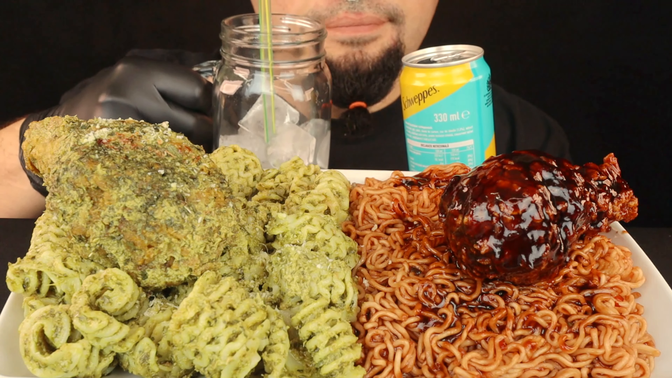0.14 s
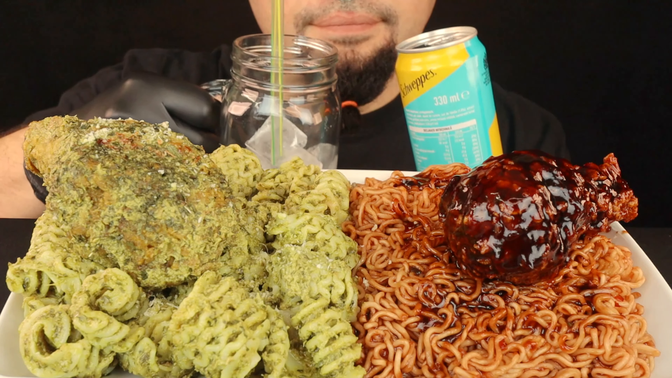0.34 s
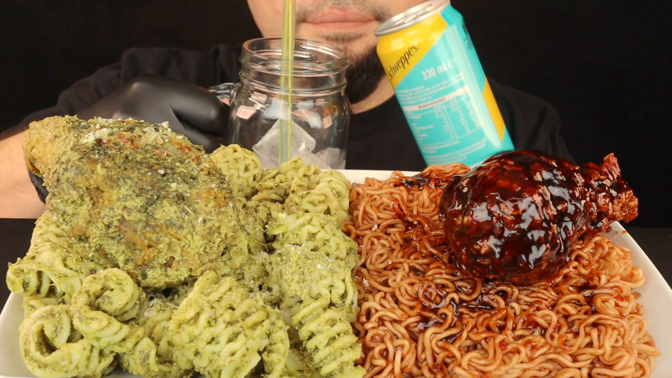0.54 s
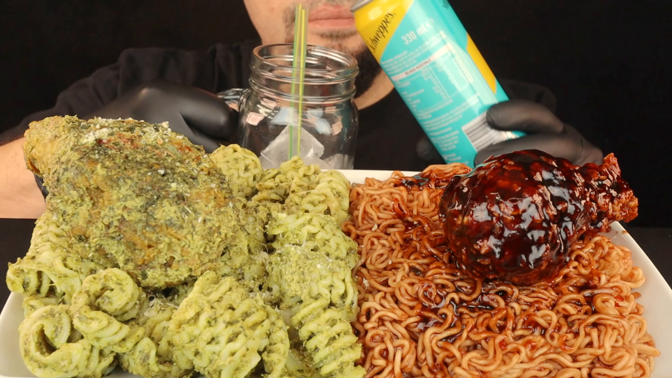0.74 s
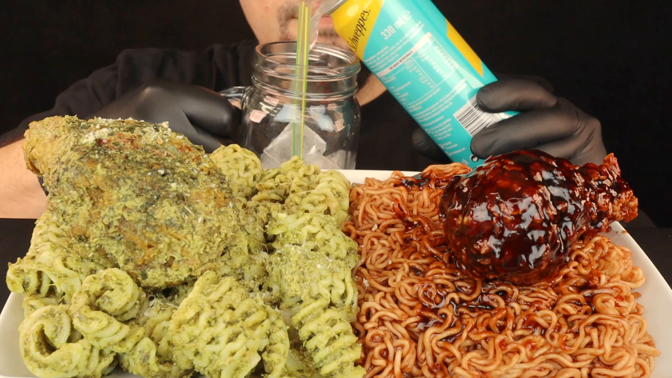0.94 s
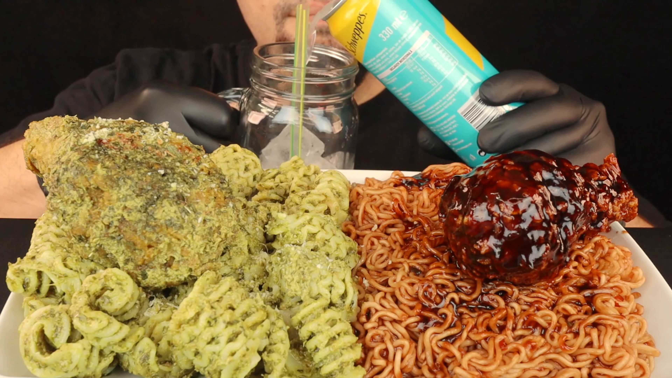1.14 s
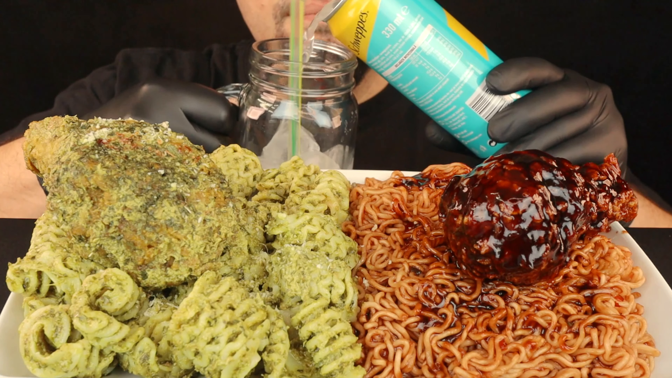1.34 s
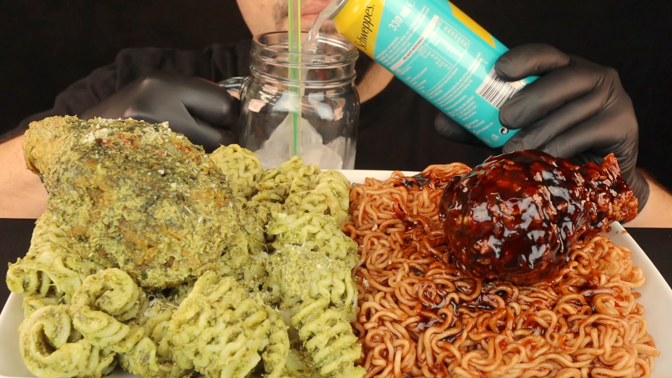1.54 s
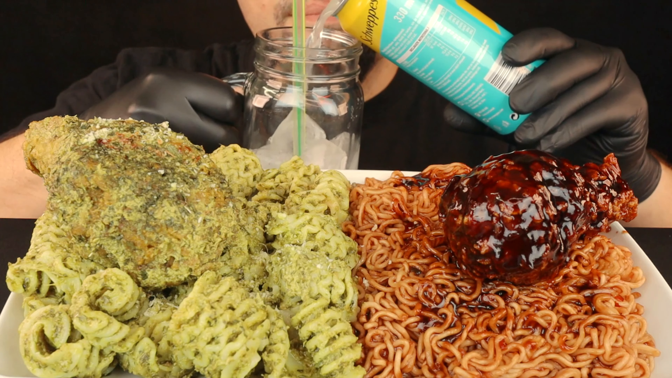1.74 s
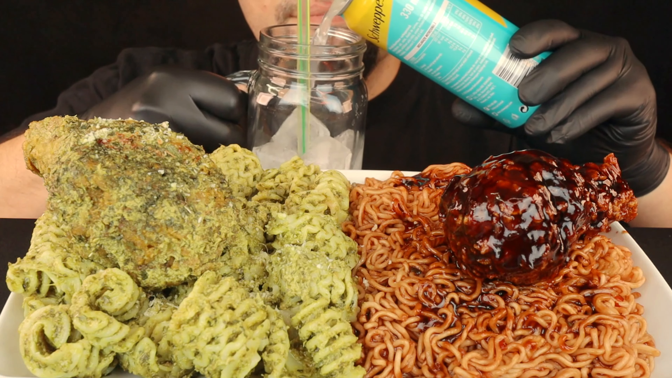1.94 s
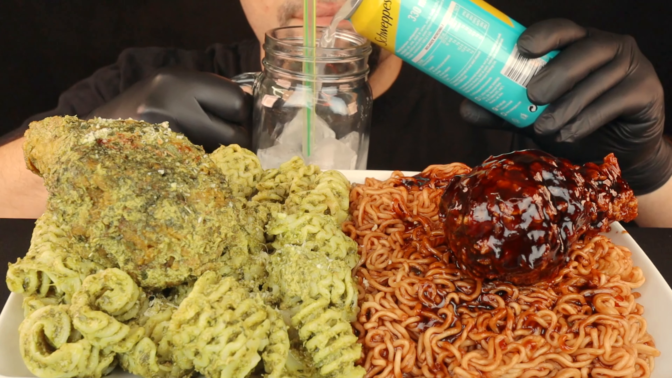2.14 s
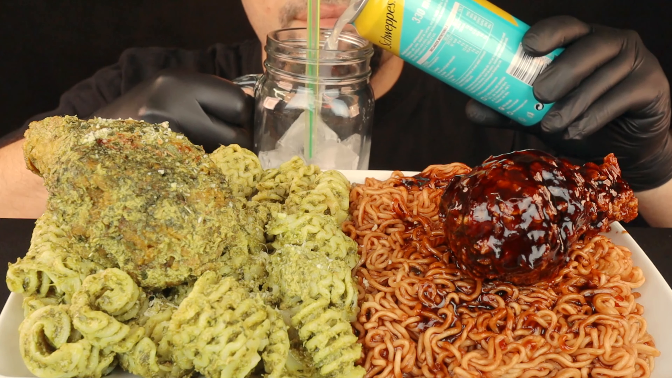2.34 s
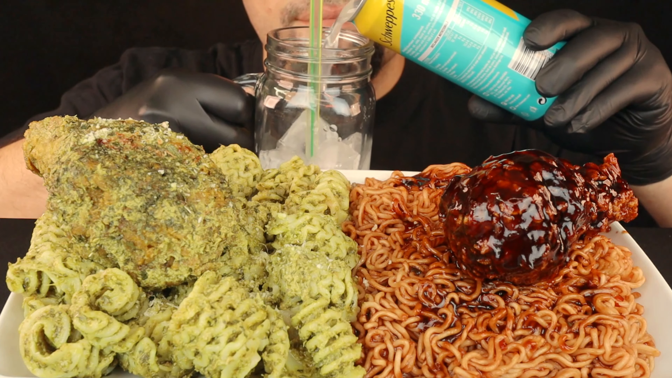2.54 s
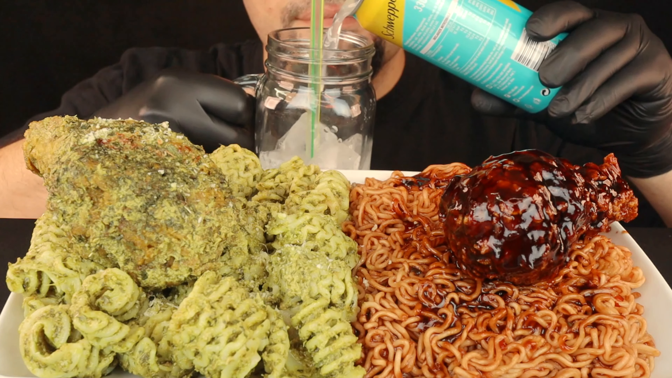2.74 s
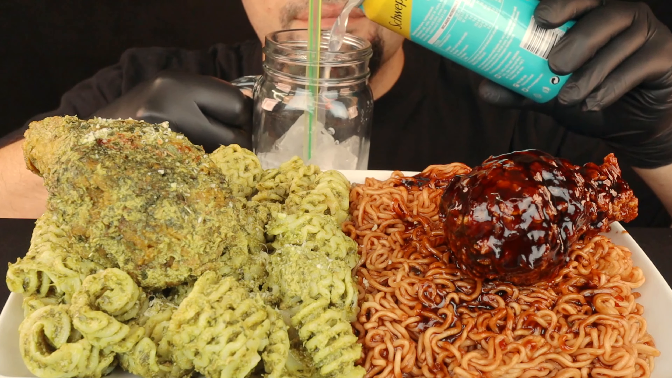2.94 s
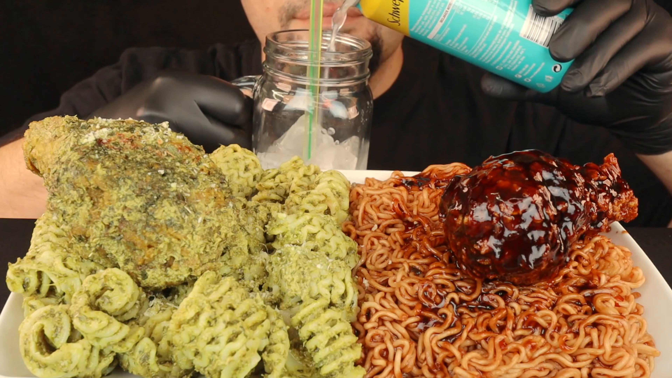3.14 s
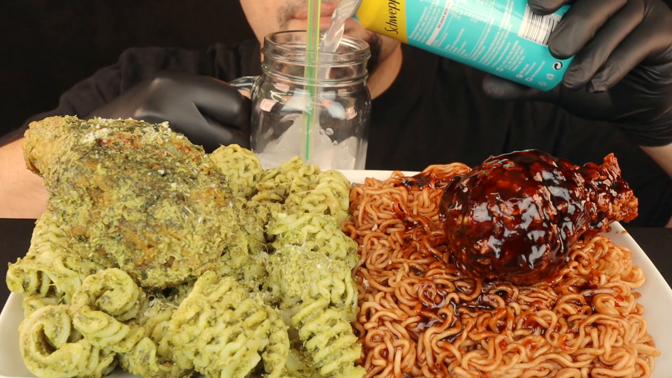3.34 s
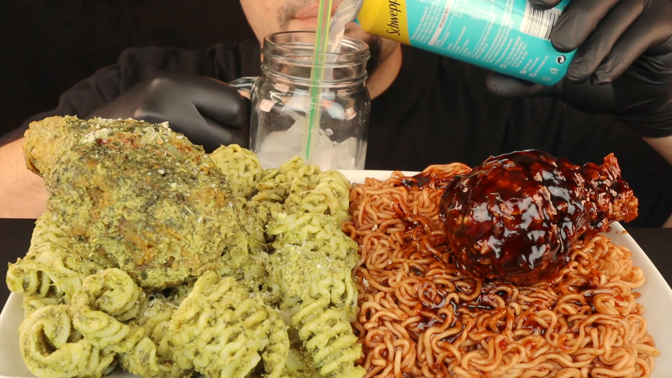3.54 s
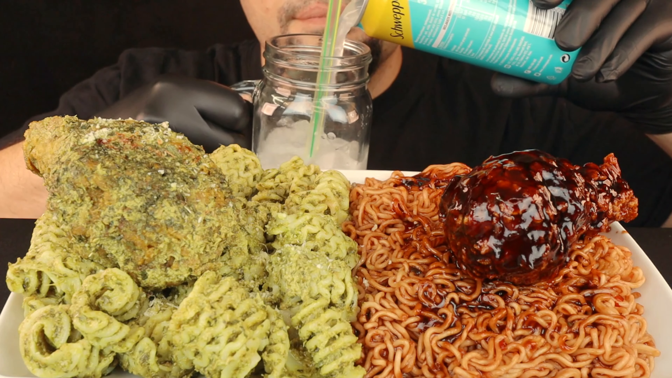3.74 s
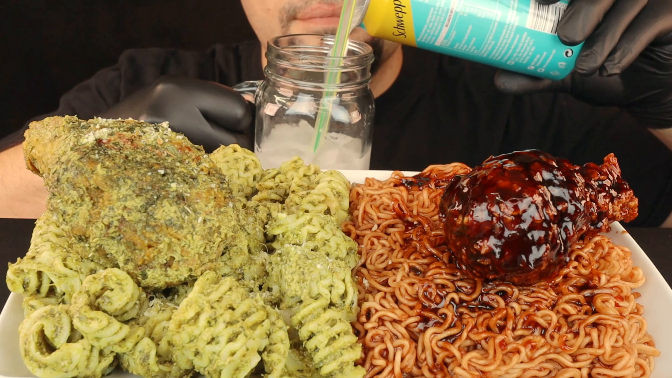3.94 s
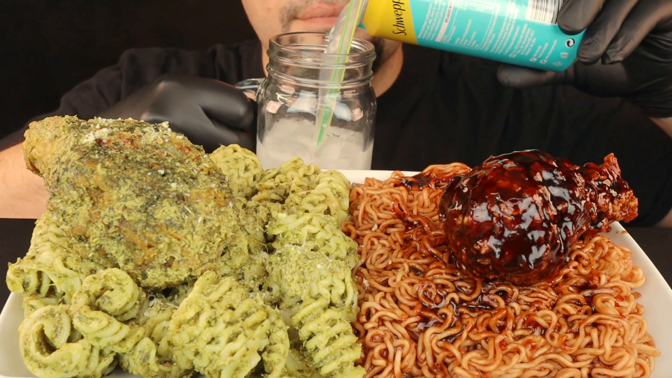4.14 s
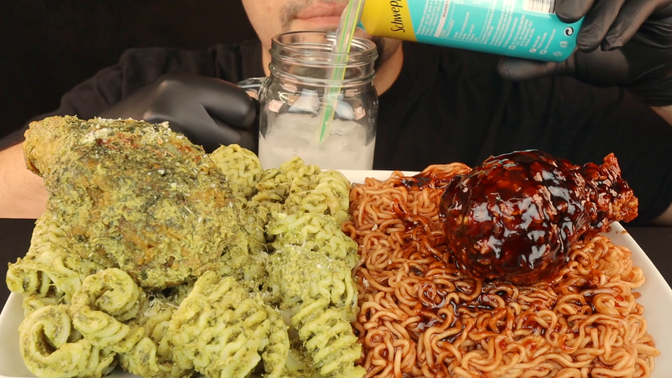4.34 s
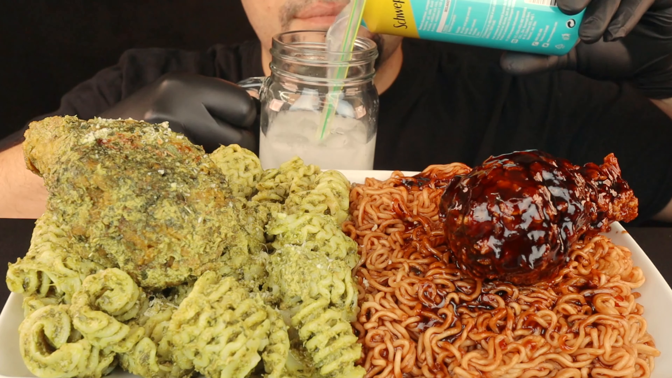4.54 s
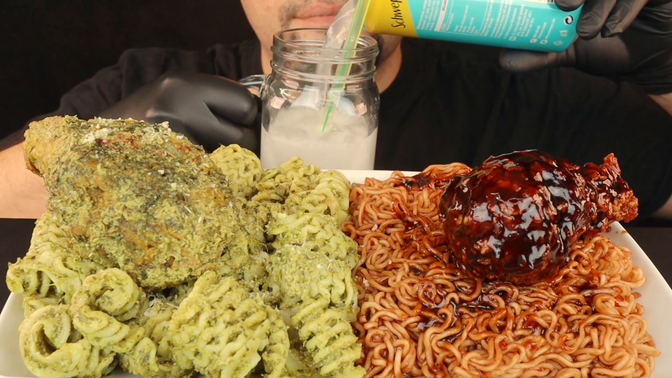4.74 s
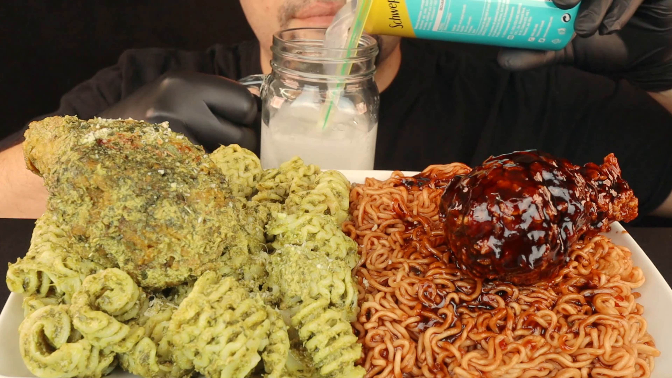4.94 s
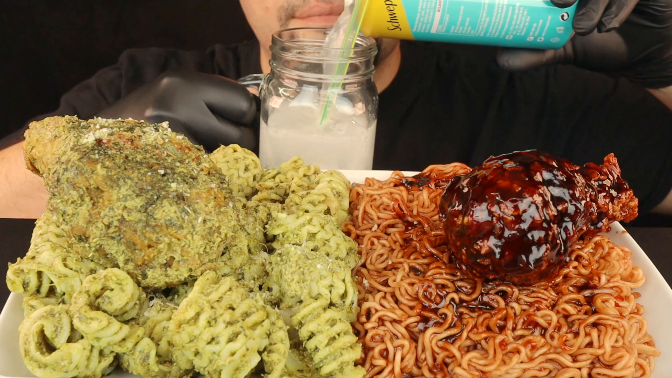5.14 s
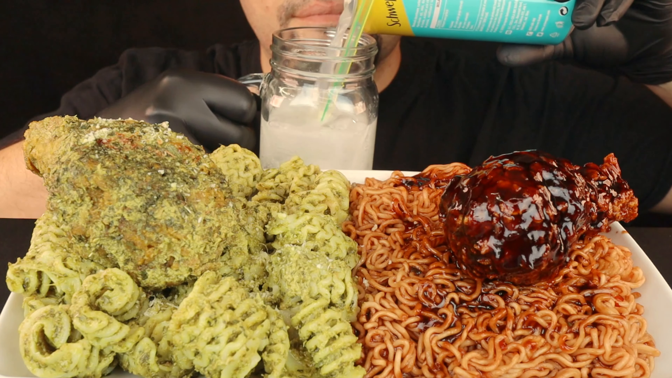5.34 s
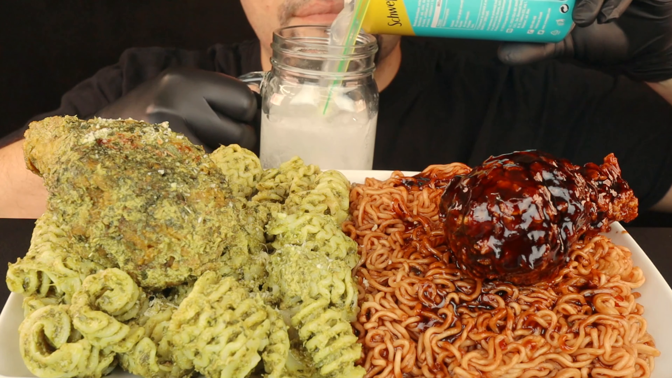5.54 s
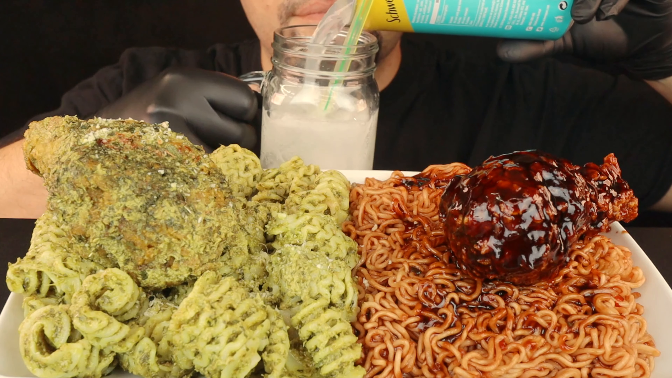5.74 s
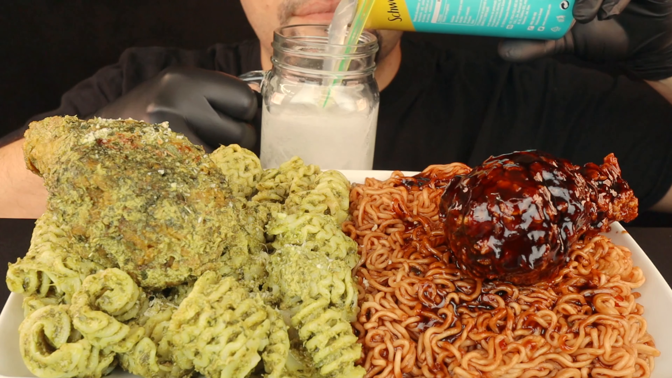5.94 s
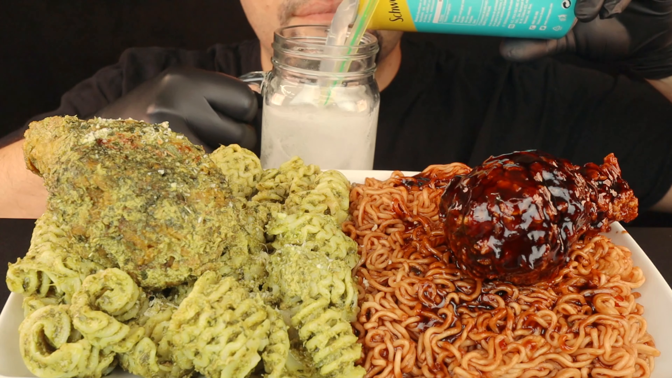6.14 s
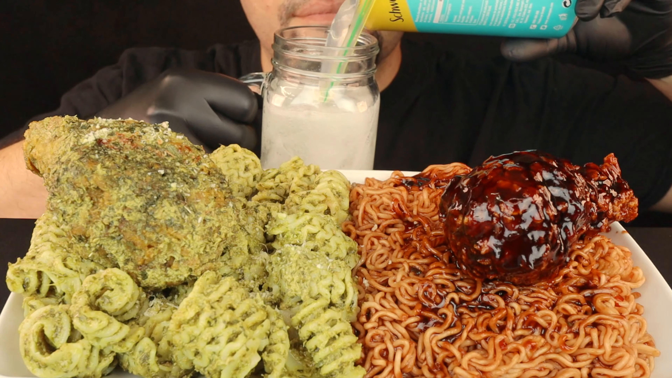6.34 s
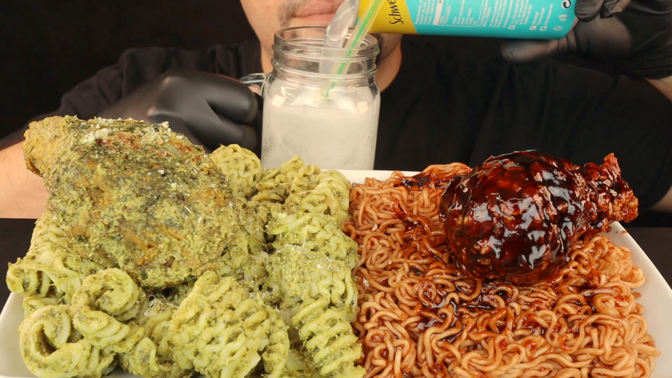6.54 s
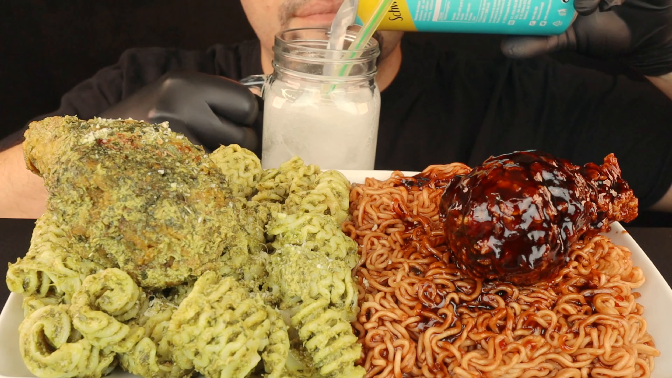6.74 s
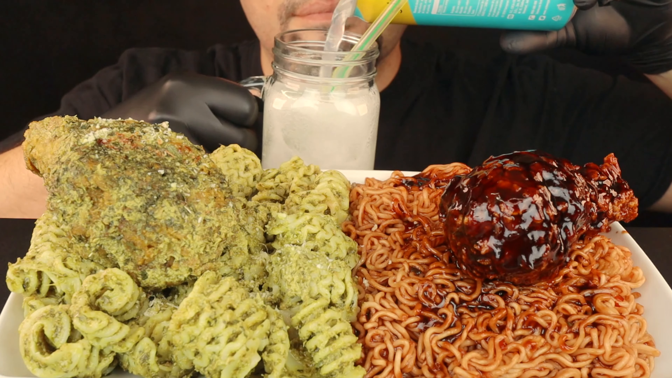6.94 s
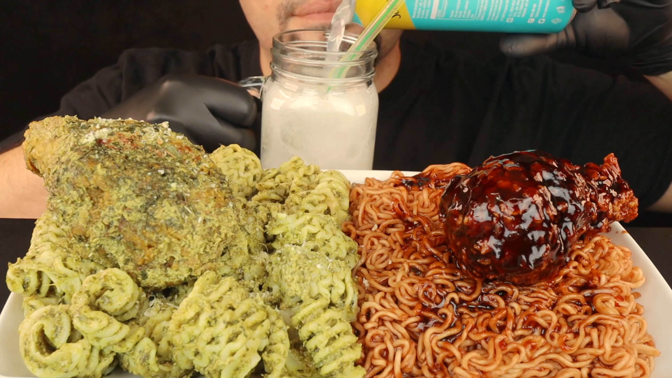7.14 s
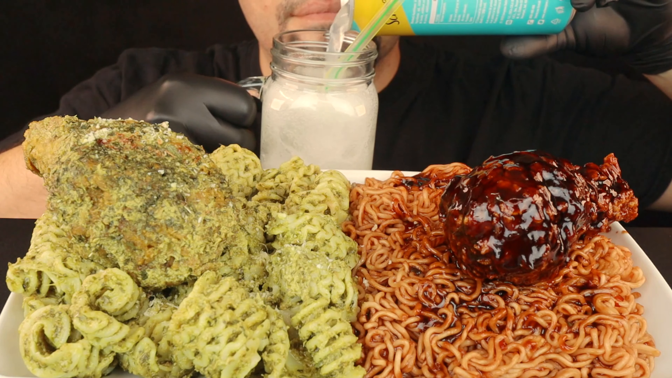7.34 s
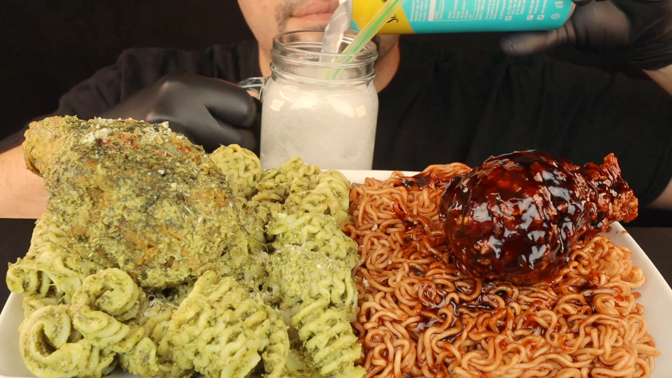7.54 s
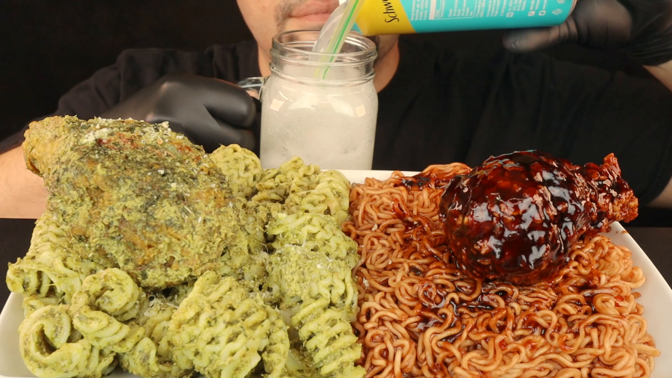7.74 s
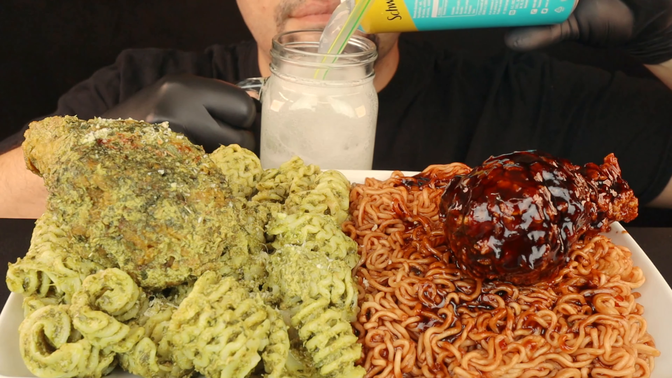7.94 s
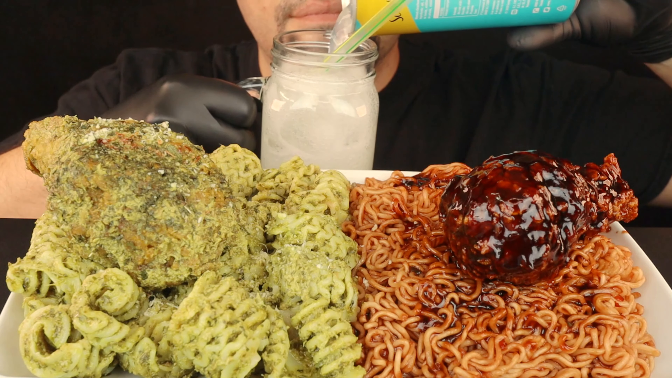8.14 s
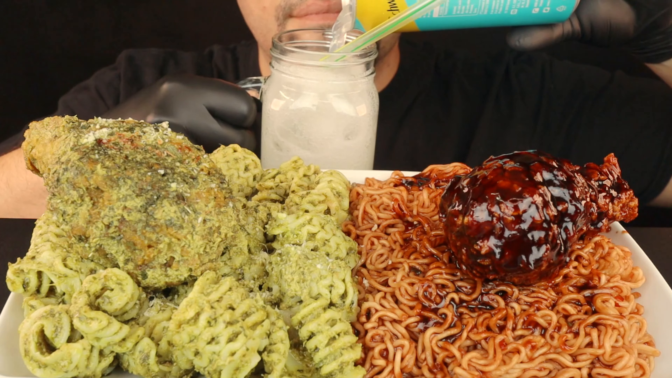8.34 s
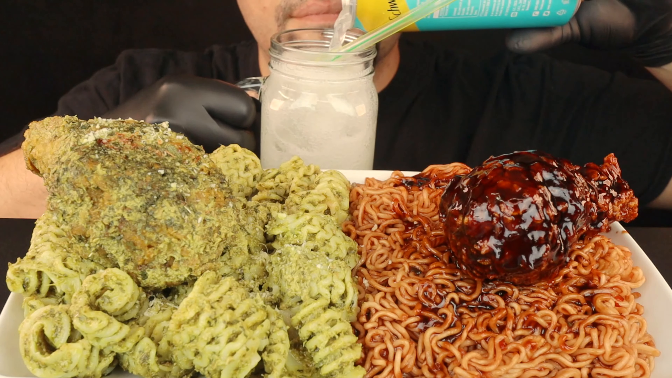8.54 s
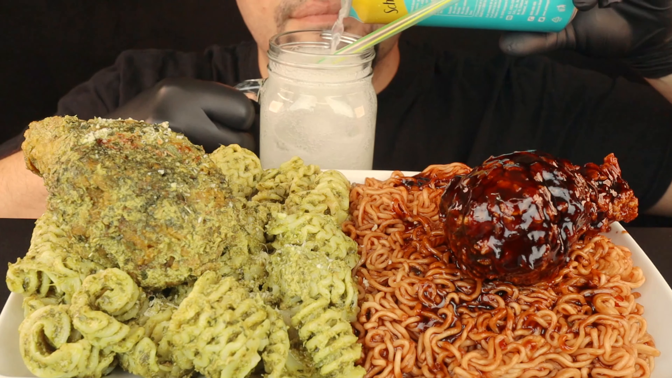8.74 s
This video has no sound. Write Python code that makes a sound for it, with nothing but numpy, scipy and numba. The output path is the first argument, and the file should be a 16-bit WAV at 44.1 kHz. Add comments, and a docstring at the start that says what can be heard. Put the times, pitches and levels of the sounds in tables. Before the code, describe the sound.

A can creaks and clinks on a glass jar, then fizzy drink glugs over ice, the pitch rising as foam builds to a crackling hiss.

```python
"""Soda poured over ice

A can of soda is picked up, knocks on a glass jar with ice and is emptied into it, close to two microphones.
Random bursts of splashes ring the air in the jar, whose pitch rises as it fills and which foam deadens.
Bubbles and gulps are swelling sines, ice and glass are short decaying modes with noise, and the fizz is
a dense rain of clicks that swells as the head climbs to the rim."""
import sys
import numpy as np
from scipy import signal
from scipy.fft import rfft, irfft, next_fast_len
from scipy.io import wavfile
from scipy.ndimage import uniform_filter1d
from numba import njit

SR = 44100
rng = np.random.default_rng(int(sys.argv[2]) if len(sys.argv) > 2 else 0)


def unload_audio(sound):
    """Save the sound as a 16-bit wav file, at the path given as the first command line argument."""
    columns = np.transpose(np.atleast_2d(sound))
    # keep every value between -1 and 1, then stretch to whole-number steps
    steps = np.round(np.clip(columns, -1, 1) * 32767)
    wavfile.write(sys.argv[1], SR, steps.astype(np.int16))


N = 387638
T = np.arange(N) / SR
BRIEF = T[:SR // 8]  # time axis of one short event


def gain_of(db):
    """Turns decibels into a factor."""
    return 10 ** (np.asarray(db) / 20)


def along(table, column, t=T):
    """Reads one column of a curve at the times t, with straight lines between rows."""
    rows = np.array(table)
    return np.interp(t, rows[:, 0], rows[:, column])


def band(x, low_hz, high_hz, order=2):
    """Keeps only the pitches between two limits."""
    limits = [low_hz, min(high_hz, SR / 2 - 1)]
    return signal.sosfilt(signal.butter(order, limits, "band", fs=SR, output="sos"), x)


def colour(x, points):
    """Gives x a spectrum drawn on a log-frequency axis."""
    hz, db = np.transpose(points)
    size = next_fast_len(N)
    log_hz = np.log(np.fft.rfftfreq(size, 1 / SR) + 1)
    shape = gain_of(np.interp(log_hz, np.log(hz), db))
    return irfft(rfft(x, size) * shape, size)[..., :N]


@njit
def smooth(x, keep):
    """One-pole low-pass whose memory may change in time."""
    out = np.zeros_like(x)
    for i in range(1, len(x)):
        out[i] = keep[i] * out[i - 1] + (1 - keep[i]) * x[i] + 1e-20
    return out


def resonate(x, hz, width):
    """A resonance of gain 1 that may move: shift its pitch to zero, smooth, shift back."""
    turn = np.exp(2j * np.pi * np.cumsum(hz * np.ones(len(x))) / SR)
    keep = np.exp(-np.pi * width * np.ones(len(x)) / SR)
    return 2 * (turn * smooth((x + 0j) / turn, keep)).real


def evened(x):
    """Scales to a level of one."""
    return x / x.std()


def played(x, level_db, size=8001):
    """Makes the running level of a stereo sound follow a curve."""
    power = uniform_filter1d(uniform_filter1d((x ** 2).mean(0), size), size)
    return x * gain_of(level_db) / np.sqrt(abs(power) + 1e-14)


def add(mix, s, db, sound):
    """Adds a stereo sound whose first hundredth of a second has the level db."""
    part = mix[:, round(s * SR):][:, :sound.shape[1]]
    start_level = np.sqrt(np.mean(sound[:, :SR // 100] ** 2))
    part += (gain_of(db) * sound / start_level)[:, :part.shape[1]]


def bursts(per_s, spread_db, most=4):
    """Random impulses of either sign: many small, few large."""
    out, at = np.zeros(N), np.flatnonzero(rng.random(N) < per_s / SR)
    signs = rng.choice([-1, 1], len(at))
    size_db = np.broadcast_to(spread_db, N)[at] * np.minimum(rng.exponential(1, len(at)), most)
    out[at] = signs * gain_of(size_db)
    return out


def bubble(hz, cycles, onset=0.46):
    """A bubble rings as a sine that swells and dies within some cycles."""
    turns = hz * BRIEF
    swell = 1 - np.exp(-turns / onset)
    return np.sin(2 * np.pi * turns) * swell * np.exp(-np.minimum(turns / cycles, 20))


def each_bubble(hits, hz, cycles):
    """Every impulse sets off one bubble."""
    return signal.oaconvolve(hits, bubble(hz, cycles))[:N]


def dying(t60):
    """Fades by 60 dB in t60 seconds."""
    return np.exp(-np.log(1000) * BRIEF / t60)


def walls(x, wet=0.99, decay_s=0.00083, low_hz=2600, size=400):
    """Treble builds up between the glass walls and reaches each microphone by other paths."""
    age = T[:size] / decay_s
    paths = band(rng.standard_normal((2, size)), low_hz, SR / 2) * age * np.exp(-age)
    paths *= wet / np.linalg.norm(paths, axis=1, keepdims=True)
    paths[:, 0] += 1  # the direct sound
    return signal.oaconvolve(x[None], paths, axes=1)[:, :len(x)]


# the drink as it rises: t/s, share of surface under foam 0-1, pitch of the churning f/Hz
DRINK_RISE = [(3.2, 0, 366), (4.7, 0.21, 294), (6.1, 0.75, 235), (7.1, 1, 205)]


def foam_at(t=T):
    """Share of the surface under foam."""
    return np.clip(along(DRINK_RISE, 1, t), 0, 1)


def cloud_ring(x, t):
    """The bubble cloud under the surface resonates low, and lower as the drink rises."""
    return resonate(x, along(DRINK_RISE, 2, t), width=99)


def leak_at(t):
    """The more foam shuts the mouth, the more of the sound comes through the glass."""
    return 0.03 + 0.16 * foam_at(t)


# air above the drink, shortening as the jar fills: t/s, lowest mode f/Hz
AIR_PITCH = [(1.3, 657), (2.2, 677), (2.8, 746), (4.5, 878), (5.5, 990), (6.0, 1110), (6.6, 1300),
             (8.8, 2020)]


def first_at(t):
    """Pitch of the lowest air mode."""
    return along(AIR_PITCH, 1, t)


def bare_at(t, knee_hz=194):
    """Share of the ice that still stands clear of the drink."""
    return np.exp((AIR_PITCH[0][1] - first_at(t)) / knee_hz)


def second_at(t, empty_hz=1448, full_hz=3600):
    """Pitch of the second air mode, which climbs fast while the ice is being covered."""
    return full_hz - (full_hz - empty_hz) * bare_at(t)


THIRD_RATIO = 1.217  # third air mode against the second


def air(x, t, upper_db=-7, upper_width=2.6):
    """The air rings higher as the jar fills, and foam damps it; ice pocket and glass add their own rings."""
    foam, bare, first, second = foam_at(t), bare_at(t), first_at(t), second_at(t)
    width = first * (0.078 + 0.28 * foam ** 2)
    upper = resonate(x, second, upper_width * width)
    upper = upper + gain_of(-9.5) * resonate(x, THIRD_RATIO * second, upper_width * width)
    upper_gain = gain_of(upper_db + 7.4 * bare - 11.0 * foam)
    pocket = 0.5 * bare ** 4 * resonate(x, 1940, 120)  # between the cubes, until they are covered
    glass = x + 1.52 * resonate(x, 746, 400) + 2.0 * resonate(x, 3470, 410)
    heard = resonate(x, first, width) + upper_gain * upper + pocket + leak_at(t) * glass
    return heard - (1 - 0.41 * foam) * resonate(heard, 1164, 210)  # a hollow in the spectrum


def air_ring(s):
    """One push on the air in the jar."""
    push = band(bubble(first_at(s), cycles=0.42), 555, 3600)
    return evened(air(push, s + BRIEF))


def slap(s):
    """The surface closes with a wet slap, each a little different; foam makes it stronger and shakes the cloud."""
    noise = rng.standard_normal(len(BRIEF)) * np.exp(-BRIEF / 0.0033)
    wet = band(noise, 520, 3030)
    hz = first_at(s) * np.exp(0.29 * rng.standard_normal())
    cloud = 1.22 * foam_at(s) * cloud_ring(noise, s)
    sound = wet + resonate(wet, hz, hz / 2) + 2.8 * resonate(wet, 657, 310) + cloud
    return 1.64 * np.sqrt(leak_at(s)) * evened(sound)


# faint noise of the room: f/Hz, relative level per Hz/dB
ROOM_COLOUR = [(15, -9), (60, -2.5), (230, -3), (700, -6.5), (3000, -13), (16000, -21)]


def room():
    """Faint low noise of a quiet room, partly shared by the two channels."""
    noise = colour(rng.standard_normal(N) + 4.2 * rng.standard_normal((2, N)), ROOM_COLOUR)
    return gain_of(-54.0) * evened(noise)


def echoes(x, t60=0.12, size=9000):
    """The short answer of the room: dying noise after a 4 ms gap."""
    tail = band(rng.standard_normal((2, size)), 140, 5500, order=1)
    tail *= np.exp(-np.log(1000) * T[:size] / t60) * (T[:size] > .004)
    return signal.oaconvolve(x, tail / np.linalg.norm(tail[0]), axes=1)[:, :N]


def lifting(rub_db=-56, rub_s=1.08, rub_length_s=0.35):
    """A soft rub as the can turns in the glove: low noise that swells and fades."""
    rub = evened(band(rng.standard_normal(N), 254, 410))
    return gain_of(rub_db) * rub * np.exp(-((T - rub_s) / rub_length_s) ** 2)


# resonances of the can as it creaks in the glove: f/Hz, width/Hz, relative level/dB
CAN_RINGS = [(658, 15, 14), (2390, 110, 0), (7600, 450, -4), (12500, 600, 5)]


def creak(start=0.184, end=.332, slips_per_s=85):
    """The can sticks and slips unevenly in the glove as it is picked up: each slip is a short bright scuff."""
    unevenness = np.exp(8 * uniform_filter1d(rng.standard_normal(N), size=200))
    turns = np.cumsum(slips_per_s * unevenness) / SR
    grip = np.sqrt(abs(np.sin(np.pi * np.clip((T - start) / (end - start), 0, 1))))
    slips = np.diff(np.floor(turns), prepend=0) * rng.uniform(0.39, 1, N) * grip
    fading = signal.oaconvolve(slips, np.exp(-BRIEF / 0.0041))[:N]
    scuffs = (fading * rng.standard_normal(N))[:SR // 2]
    metal = sum(gain_of(db) * resonate(scuffs, hz, width) for hz, width, db in CAN_RINGS)
    ring = walls(0.5 * band(scuffs, 5200, 14000) + metal, wet=2)
    return np.pad(gain_of(-42.0) * evened(ring), ((0, 0), (0, N - SR // 2)))


# modes of the jar with ice: f/Hz, level before tilt/dB, fade by 60 dB t/s
JAR_MODES = [(483, -11, 0.12), (672, 0, 0.11), (940, -8, 0.029), (1466, -3, 0.036), (2220, -4, 0.1),
             (2690, 5, 0.05), (3135, -7, 0.12), (4030, -1.5, 0.027), (5120, -8, 0.041)]


def glassy(x, ring=1.0):
    """What bursts against the wall sets the modes of the jar ringing."""
    modes = sum(np.cos(2 * np.pi * hz * BRIEF) * dying(t60) * 2 * np.log(1000) / (t60 * SR)
                for hz, _, t60 in JAR_MODES)
    return x + ring * signal.oaconvolve(x, modes[None], axes=1)[:, :N]


# knocks of can and ice on the jar: t/s, level/dB, tilt/dB per octave
JAR_KNOCKS = [(0.9634, -18, -4.5), (0.9933, -28.5, -6), (1.3806, -11, 10), (1.3873, -14.5, -2),
              (1.416, -17.5, 5)]


def knocks():
    """A knock is a short noisy crack plus the modes of the jar, slightly detuned each time."""
    out, (hz, mode_db, t60) = np.zeros((2, N)), np.transpose(JAR_MODES)[:, :, None]
    for s, db, tilt_db in JAR_KNOCKS:
        # each channel hears its own phases, more so in the treble
        phase = 2 * np.pi * rng.random(hz.shape) + rng.standard_normal((2, *hz.shape)) * hz / 5000
        detuned = hz * (1 + 0.025 * rng.standard_normal(hz.shape))
        strength = gain_of(mode_db + tilt_db * np.log2(hz / 2000))
        ring = strength * dying(t60) * np.sin(2 * np.pi * detuned * BRIEF + phase)
        crack = band(rng.standard_normal((2, len(BRIEF))), 1100, 4800, order=1) * np.exp(-BRIEF / 0.0082)
        add(out, s, db, ring.sum(1) + gain_of(17) * crack)
    return out


# floating ice bumps the glass: t/s, level/dB, tilt/dB per octave
ICE_BUMPS = [(6.6598, -20.5, -6), (6.685, -12.5, -6.5), (7.038, -12, -9), (7.112, -10, 5.5),
             (7.4189, -17.5, 2), (7.456, -23, -9), (7.7947, -15, 1.5), (8.3185, -12.5, 3),
             (8.4835, -13, 1.5)]
# ice against glass, damped by the drink: f/Hz before detuning, level before tilt/dB, fade by 60 dB t/s
ICE_MODES = [(666, -2.5, 0.023), (910, -1.5, 0.026), (1470, 3.5, 0.011), (2040, -8, 0.027), (3294, 0, 0.02)]


def bumps(thump_db=-5):
    """Floating ice nudges the glass: a dull thump of noise and a few short modes."""
    out, (hz, mode_db, t60) = np.zeros((2, N)), np.transpose(ICE_MODES)[:, :, None]
    for s, db, tilt_db in ICE_BUMPS:
        turns = hz * rng.uniform(0.937, 1.034, hz.shape) * BRIEF
        strength = rng.choice([-1, 1], hz.shape) * gain_of(mode_db + tilt_db * np.log2(hz / 1000))
        ring = strength * dying(t60) * np.sin(2 * np.pi * turns)
        thump = evened(band(rng.standard_normal(len(BRIEF)), 156, 1800)) * np.exp(-BRIEF / 0.0079)
        bump = ring.sum(0) + gain_of(thump_db) * thump
        add(out, s, db, walls(band(bump, 480, 4300), wet=0.6))
    return out


# sharp ticks of can, drops and cracking ice: t/s, level/dB, centre f/Hz
SHARP_TICKS = [(0.2062, -37, 7700), (0.6496, -28, 9150), (0.731, -36, 9100), (1.2438, -23, 6260),
               (1.448, -24, 8500), (1.6178, -20.5, 9500), (1.684, -17.5, 12600), (1.7466, -20.5, 7060),
               (2.677, -18.5, 10800), (2.927, -16.5, 9000), (3.288, -25, 9500), (3.303, -24, 7950),
               (3.397, -20.5, 11000), (3.4635, -14, 10900), (3.509, -17.5, 7950), (3.6522, -20.5, 9100),
               (3.7055, -17, 10300), (3.8856, -14, 8650), (4.203, -16.5, 9100), (4.261, -16.5, 11900),
               (4.3903, -15.5, 12600)]


def ticks():
    """A tick is a few quickly dying cycles of a high sine, with a push on the air in the jar."""
    out = np.zeros((2, N))
    for s, db, hz in SHARP_TICKS:
        add(out, s, db, walls(evened(bubble(hz, cycles=0.78)) + 0.26 * air_ring(s), wet=2.5))
    return out


# the can gulps air: t/s, level/dB, f/Hz
CAN_GULPS = [(5.044, -32, 125.2), (5.073, -27, 110), (5.137, -22.5, 146), (5.567, -26.5, 112),
             (5.63, -24.5, 100), (5.686, -32.5, 200)]


def gulps():
    """A gulp is a slow-swelling low bubble, while the drink slops back inside the can as low noise."""
    out = np.zeros((2, N))
    for s, db, hz in CAN_GULPS:
        slosh = band(rng.standard_normal(len(BRIEF)), 170, 306) * np.exp(-BRIEF / 0.035)
        gulp = band(bubble(hz, cycles=0.34, onset=2.0), 50, 400, order=1) + 0.12 * slosh
        add(out, s, db, np.array([gulp] * 2))
    return out


# gas escaping, first in the can, then in the jar, last from the head at the rim: t/s, level of the fizz/dB
GAS_CURVE = [(0.0, -53), (0.5, -48), (0.9, -42), (1.1, -46), (1.3, -37), (1.8, -32.5), (2.3, -26),
             (4.9, -26), (5.5, -29), (6.6, -30.5), (6.9, -25.5), (7.6, -22), (8.79, -21.5)]


def gas_db():
    """Level of the escaping gas over time."""
    return along(GAS_CURVE, 1)


# colour of the fizz: f/Hz, relative level per Hz/dB
FIZZ_COLOUR = [(2650, 12), (4500, 0.5), (7900, 0.5), (9240, -1), (10100, -4.5), (12400, -3.5),
               (15800, -6.5)]


def fizz(count=10):
    """Thousands of tiny bubbles burst every second, more as the fizz swells and more evenly in the foam."""
    level_db = gas_db()
    crowd = np.sqrt(gain_of(level_db - level_db.max()))
    pops = sum(walls(bursts(per_s=1300 * crowd, spread_db=5.0 - 1.7 * foam_at()), wet=7.0)
               for _ in range(count))
    return played(band(colour(pops, FIZZ_COLOUR), 5820, 18800), level_db)


# the stream from the can, a trickle at first, then in surges: t/s, strength/dB
STREAM = [(1.15, -42), (1.35, -9), (1.7, -10.5), (1.85, -16.5), (2.5, -18), (2.8, -4.5), (3.38, -11),
          (3.55, -2.5), (4.0, 0), (4.15, -5), (4.7, -6.5), (5.1, -4.5), (5.4, -10), (5.95, -4.5),
          (6.4, -10), (7.35, -10.5), (7.85, -3.5), (8.79, -8.5)]


def flow_db():
    """Strength of the stream over time, 0 dB at full flow."""
    return along(STREAM, 1)


def pouring():
    """One once the stream has started, zero before."""
    return T > STREAM[0][0]


def small_bubbles(count=28):
    """Swarms of short pings, each size with its own paths; gas and stream make them louder and denser."""
    level_db = -4.5 + gas_db() + 0.25 * flow_db()
    crowd = np.sqrt(gain_of(level_db - level_db.max())) * (0.4 + foam_at())
    swarm = 0
    for hz in np.geomspace(2600, 5400, count):
        hits = bursts(per_s=130 * crowd, spread_db=4.5 - 2 * foam_at())
        swarm = swarm + walls(each_bubble(hits, hz, cycles=1.8), wet=1.36) * (hz / 3500) ** 0.93
    return played(glassy(band(swarm, 1700, SR / 2)), level_db) * pouring()


def plips(count=12, plip_db=-41):
    """Now and then a bubble in the open drink rings longer and stands out from the swarm."""
    clear = (1 - foam_at()) ** 2
    drops = sum(each_bubble(bursts(per_s=5 * clear, spread_db=8.0, most=2.2), hz, cycles=5.2)
                for hz in np.geomspace(2600, 5400, count))
    drops = walls(band(drops, 1600, SR / 2) + air(drops, T), wet=0.9)
    return gain_of(plip_db + 0.52 * flow_db()) * pouring() * evened(drops)


# single ringing bubbles, large and small: t/s, level/dB, f/Hz
SINGLE_PINGS = [(1.5037, -11.5, 675), (1.5226, -26, 635), (1.696, -17, 620), (1.7205, -12, 3310),
                (1.821, -26, 3980), (2.062, -22, 4230), (2.078, -32, 646), (2.102, -19, 3130),
                (2.229, -37, 578), (2.6394, -20.5, 3720), (2.837, -21, 4200), (3.011, -23, 2800),
                (3.1045, -17.5, 4000), (3.7226, -14, 4220), (3.994, -12.5, 5340), (5.8452, -14.5, 1180),
                (6.502, -14, 1580), (6.7837, -12, 1600), (6.909, -13.5, 1410), (7.816, -8.5, 1720)]


def pings():
    """A bubble sings for several cycles, rings the air in the jar and slaps the surface."""
    out = np.zeros((2, N))
    for s, db, hz in SINGLE_PINGS:
        ping = band(bubble(hz, cycles=4.7), hz / 2, SR / 2)
        ringing = evened(ping + air(ping, s + BRIEF))
        add(out, s, db, walls(ringing + (0.35 + foam_at(s) / 2) * slap(s)))
    return out


def spatter(middle_s=3.79, length_s=0.36, spatter_db=-30, count=8):
    """For a moment the stream sprays the ice with fine droplets, each a sharp click."""
    drops = sum(walls(band(bursts(per_s=22, spread_db=5.0, most=3.0), 2200, 12000), wet=1.1)
                for _ in range(count))
    return gain_of(spatter_db) * np.exp(-((T - middle_s) / length_s) ** 4) * evened(drops)


# drops that slap the ice and the open surface, each near the second air mode: t/s, level/dB
DROP_SPLATS = [(1.309, -23), (1.693, -20.5), (1.7455, -27.5), (2.391, -38), (2.509, -23), (2.5504, -21),
               (2.601, -21.5), (2.709, -21.5), (2.7615, -22), (3.054, -25.5), (3.615, -21.5),
               (3.6599, -17.5), (3.8077, -19.5), (3.851, -21.5), (3.8848, -20), (3.912, -22), (3.931, -16),
               (3.978, -16), (4.0336, -20), (5.634, -18)]


def splats():
    """A drop lands as a very short bubble with a puff of spray, and rings the air in the jar."""
    out = np.zeros((2, N))
    for s, db in DROP_SPLATS:
        hz = second_at(s)
        spray = band(rng.standard_normal(len(BRIEF)), hz / 2, 2.03 * hz) * np.exp(-BRIEF / 0.0018)
        splat = band(bubble(hz, cycles=1.12) + spray, hz / 2, SR / 2)
        add(out, s, db, walls(evened(splat + 2 * air(splat, s + BRIEF)) + 0.44 * air_ring(s)))
    return out


def gurgle(middle_s=2.47, length_s=0.49, gurgle_db=-36, width_hz=260):
    """The thin stream patters on bare ice and rings the upper air modes, which glide up as the cubes go under."""
    patter = bursts(per_s=70, spread_db=3.5)
    ring = sum(resonate(resonate(patter, hz, width_hz), hz, width_hz)
               for hz in (second_at(T), THIRD_RATIO * second_at(T)))
    return gain_of(gurgle_db) * np.exp(-((T - middle_s) / length_s) ** 2) * evened(walls(ring))


def churn(deep_s=3.13, shallow_db_per_s=20):
    """The bubble cloud needs depth and a strong flow; it throbs lower and more evenly as it grows."""
    throb = band(cloud_ring(bursts(per_s=500, spread_db=6 - 2 * foam_at()), T), 156, 530)
    too_shallow_db = shallow_db_per_s * np.maximum(deep_s - T, 0)
    return played(np.array([throb, throb]), -38 + 2.19 * flow_db() - too_shallow_db)


# big glugs of trapped air, each at the pitch of the air in the jar: t/s, level/dB
BIG_GLUGS = [(1.3269, -21.5), (1.4195, -17), (1.483, -26), (1.5542, -23.5), (1.597, -27.5), (1.634, -28),
             (2.769, -17.5), (2.8203, -18.5), (2.881, -20), (2.969, -17.5), (3.0361, -19), (3.24, -20),
             (3.9789, -18.5), (4.016, -15.5), (4.356, -24), (4.3899, -14.5), (4.471, -15.5), (4.777, -25),
             (4.8324, -18.5), (4.913, -17), (5.0751, -19.5), (5.111, -20), (5.164, -19), (5.183, -18.5),
             (5.401, -24), (5.42, -23.5), (5.6323, -15), (5.778, -29.5), (5.94, -11), (5.961, -13),
             (5.988, -23.5), (6.027, -20), (6.0626, -20), (6.228, -20), (6.317, -22), (6.5468, -14),
             (6.618, -24.5), (7.2, -19), (7.315, -19.5), (7.88, -15.5), (8.002, -15), (8.057, -16),
             (8.157, -11.5), (8.3887, -14), (8.528, -16.5)]


def glugs():
    """A glug pushes the air in the jar and closes with a wet slap."""
    out = np.zeros((2, N))
    for s, db in BIG_GLUGS:
        add(out, s, db, walls(air_ring(s) + slap(s), wet=0.84))
    return out


def splash(count=10):
    """Bubbles of many sizes ring the air, more densely in a strong stream; foam adds a simmer that follows gas."""
    crowd, foam = gain_of(flow_db() / 2), foam_at()
    blips = sum(each_bubble(bursts(per_s=105 * crowd, spread_db=6.0 - foam), hz, cycles=1.08)
                * (hz / 1000) ** 0.51 for hz in np.geomspace(680, 2200, count))
    simmer = band(bursts(per_s=6000, spread_db=5.0), 940, 3800)
    falling = gain_of(-25 + flow_db())
    seething = foam * gain_of(-2 + gas_db())
    both = np.hypot(falling, seething)
    drive = (falling * evened(blips) + seething * evened(simmer)) / both
    return played(walls(air(drive, T, upper_db=-11), wet=1.1, low_hz=3200), 20 * np.log10(both))


def scene():
    """Sums all sources; jar and can reach both channels with the same sign, a little louder in the first."""
    stream = splash() + churn() + gurgle() + spatter() + plips() + small_bubbles() + fizz()
    events = glugs() + pings() + splats() + ticks() + gulps() + bumps() + knocks() + creak()
    near = stream + events
    heard = near + gain_of(-16) * echoes(near)
    return heard * gain_of([[.9], [-1.1]]) + lifting() + room()  # dB for each channel


def record(dry, edge_hz=15850):
    """The loudest pops overload softly, which leaves a low thud; then the treble is cut above the edge."""
    held = dry / (1 + dry ** 6) ** (1 / 6)
    thud = gain_of(-22) * band(held ** 4, 32, 160)
    low_pass = signal.firwin(401, edge_hz, window=("kaiser", 8), fs=SR)
    return signal.oaconvolve(held + thud, low_pass[None], "same", axes=1)


dry = scene()
out = record(dry)
unload_audio(out)
```